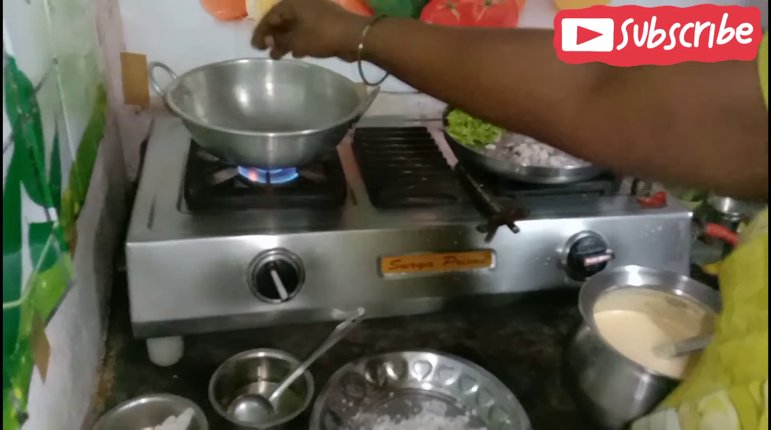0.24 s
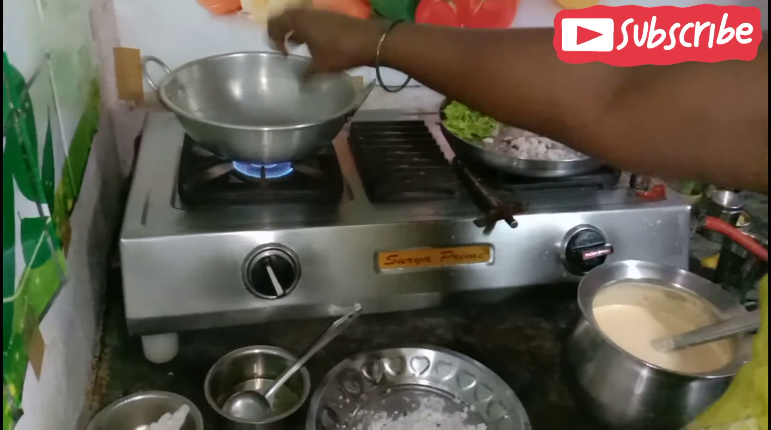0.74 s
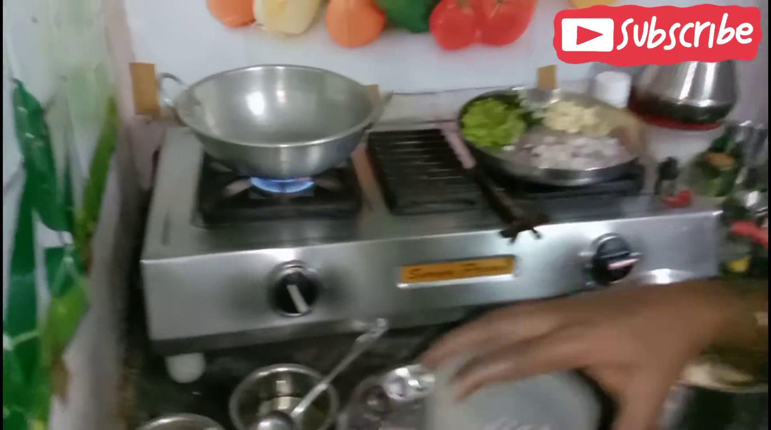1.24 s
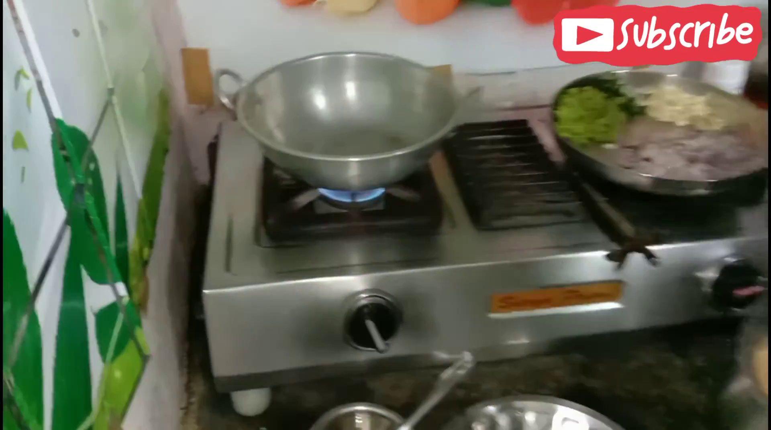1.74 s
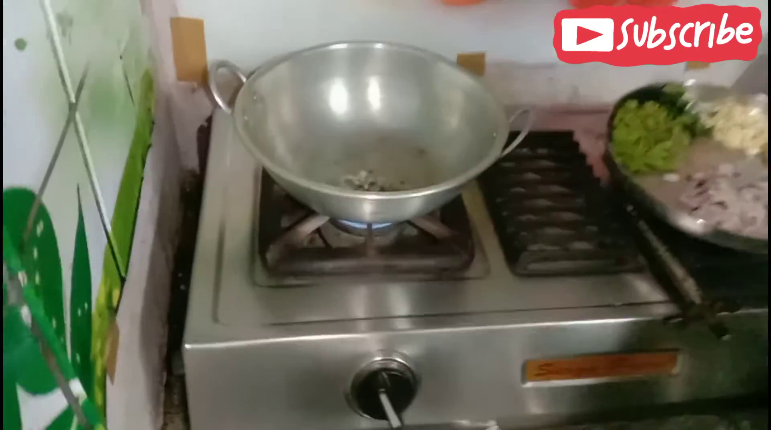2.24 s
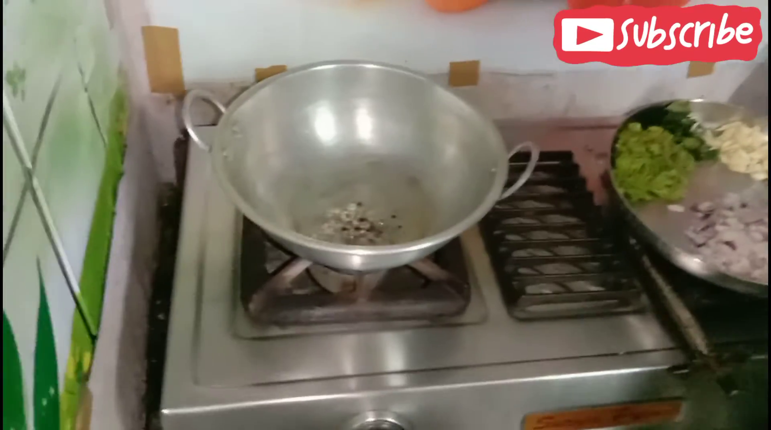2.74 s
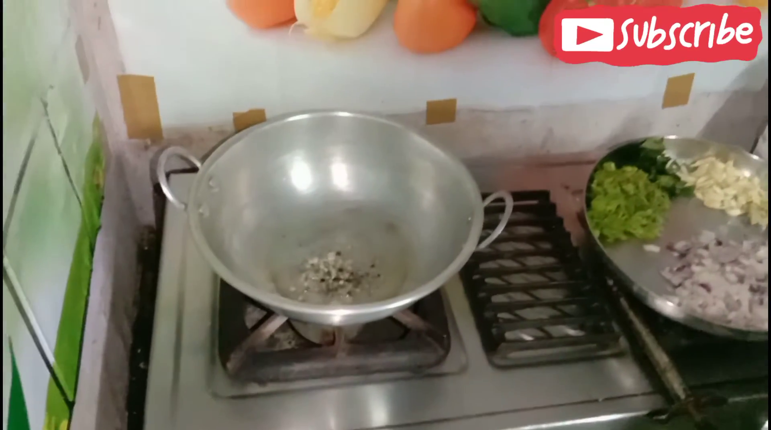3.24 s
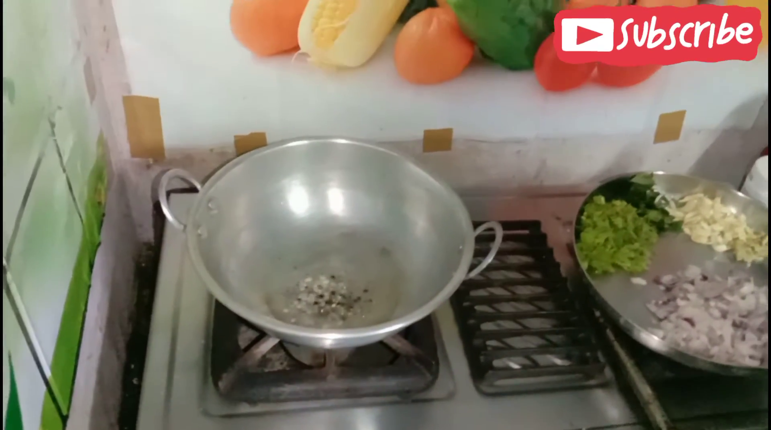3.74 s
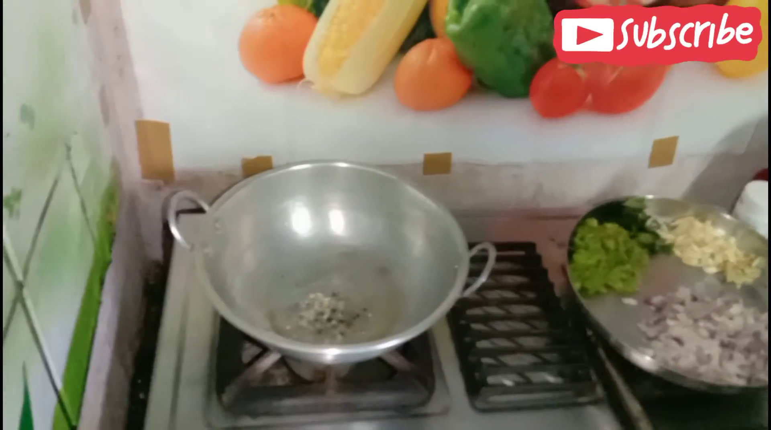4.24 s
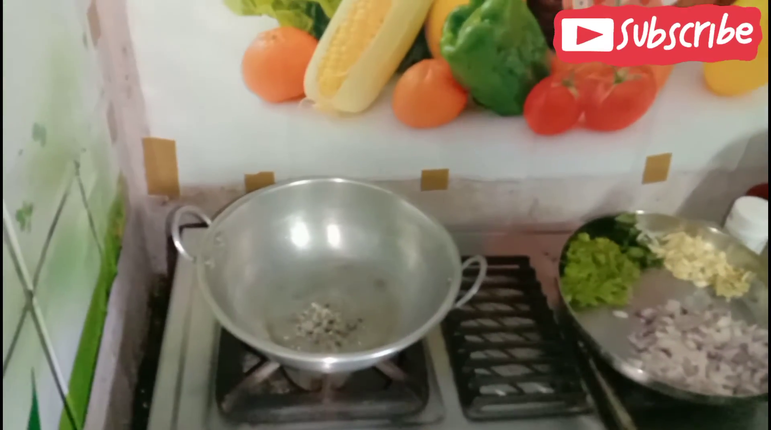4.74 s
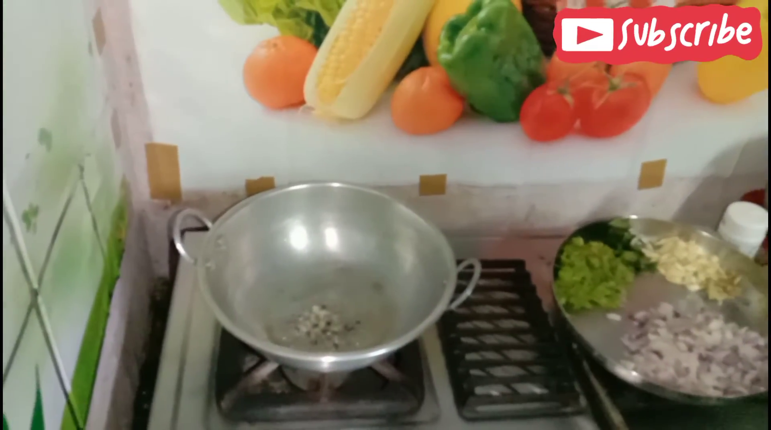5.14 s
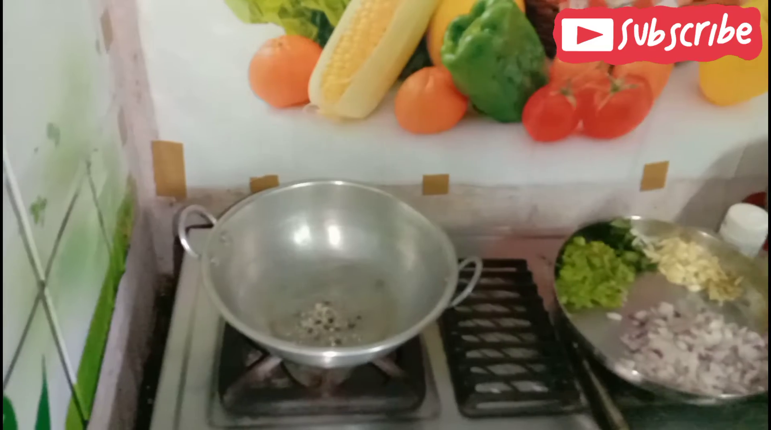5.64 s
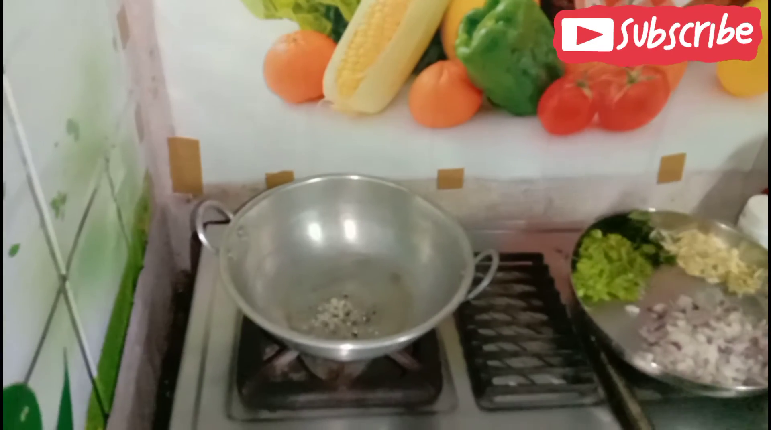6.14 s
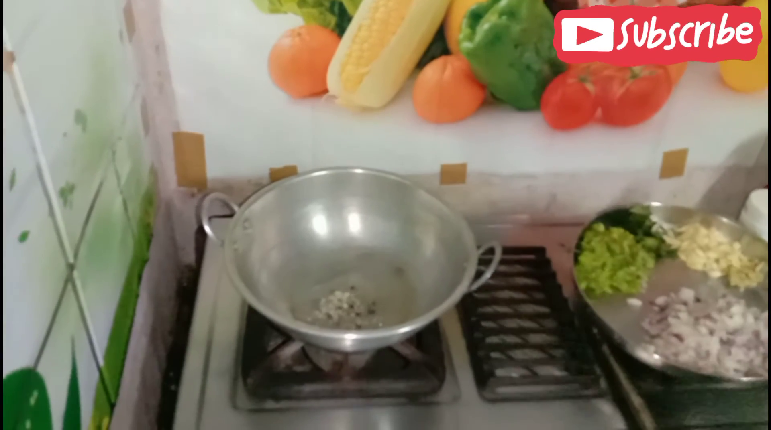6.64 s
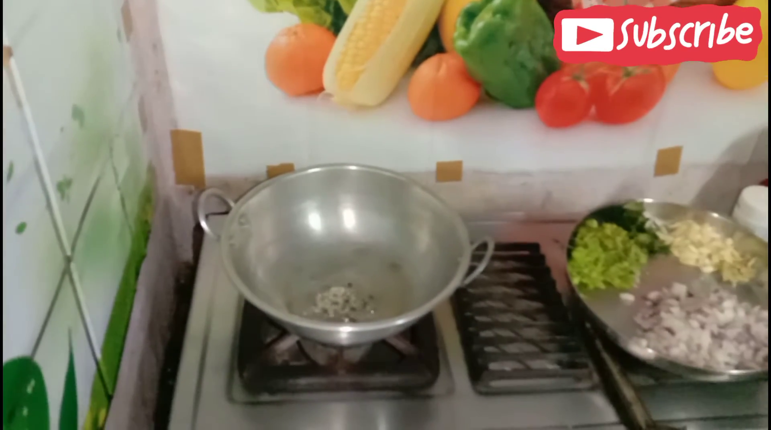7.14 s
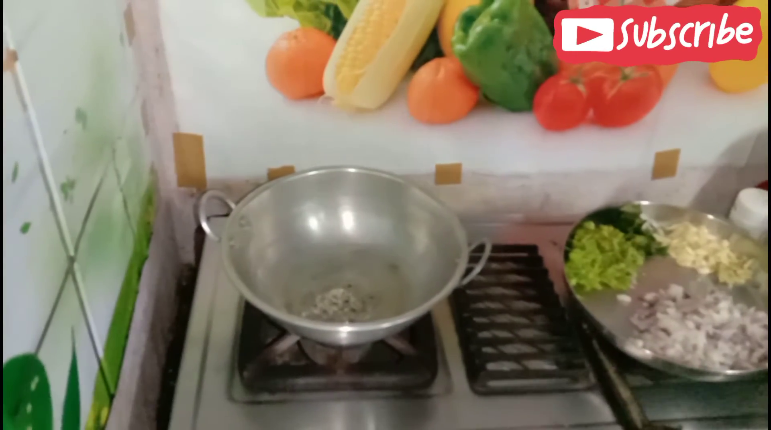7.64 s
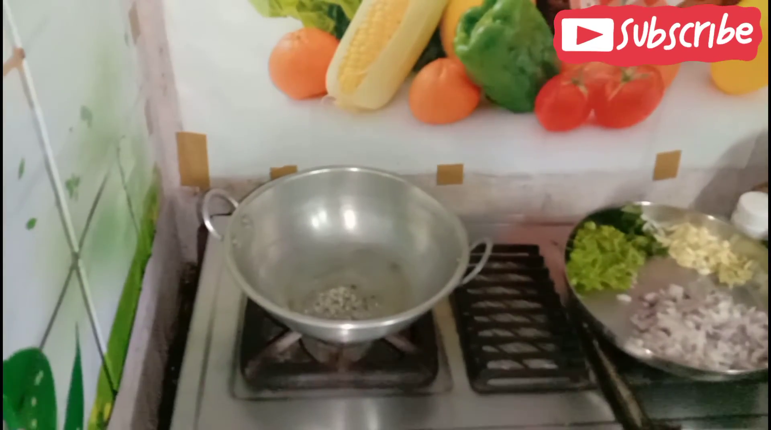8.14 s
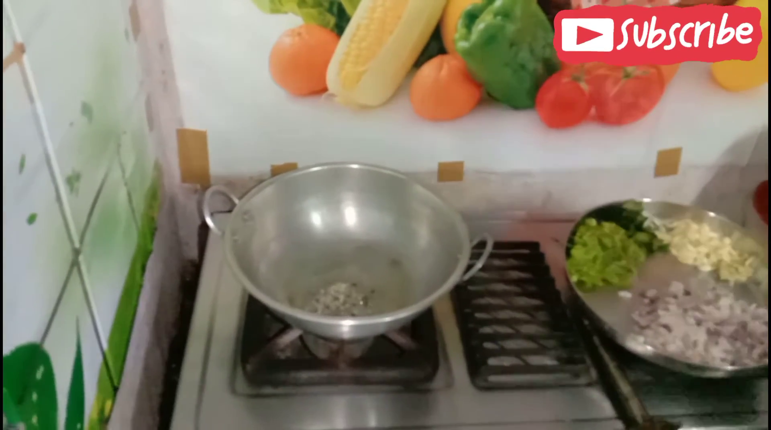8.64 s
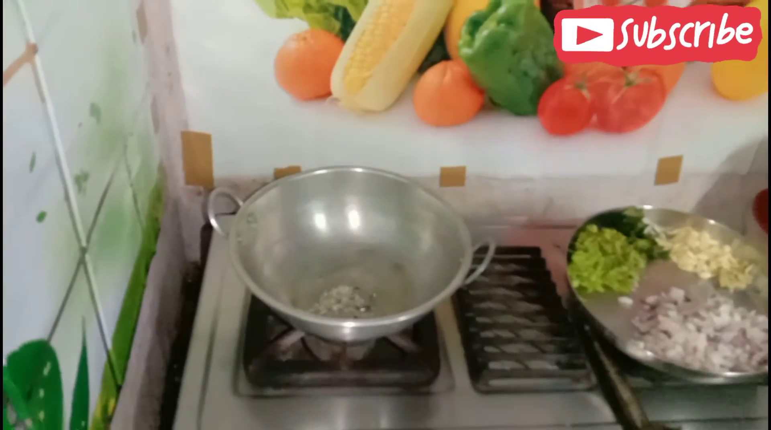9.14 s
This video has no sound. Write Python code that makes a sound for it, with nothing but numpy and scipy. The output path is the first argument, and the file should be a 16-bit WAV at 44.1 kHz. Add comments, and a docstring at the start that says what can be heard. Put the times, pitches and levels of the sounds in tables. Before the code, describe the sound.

Dry seeds patter into a ringing steel pan and splutter in oil; knocks and scrapes intrude midway, then the popping thins out.

```python
"""Seeds pop and fizz in hot oil in a steel pan over a gas flame, in a small tiled kitchen.
Pops and fizz are noise bursts and grains shaped by the seeds, the pan's modes and the oil spray.
Stray seeds tick and rain on the pan; dishes knock and drag on the counter, and a sliding jar groans.
Fingers tap the listening phone as one-cycle pushes; the flame's hiss and the house's rumble are
shaped noise. The phone's case and microphone port colour it all, with a rise in the lower treble."""
import sys
import numpy as np
from scipy import signal
from scipy.fft import rfft, irfft, next_fast_len
from scipy.io import wavfile
from scipy.ndimage import uniform_filter1d, map_coordinates

SR = 44100
rng = np.random.default_rng(int(sys.argv[2]) if len(sys.argv) > 2 else 0)


def transcribe(u):
    """Save the signal u as a 16-bit wav file named by the first command-line argument.

    u: samples, shape (n,) or (channels, n), limited to [-1, 1]; the rate is SR.
    q: integer samples, one column per channel.
    """
    v = np.clip(np.atleast_2d(u).T, -1, 1)
    q = np.round(v * 32767).astype(np.int16)
    wavfile.write(sys.argv[1], SR, q)


N = 414540
T = np.arange(SR // 3) / SR  # time within one short sound [s]

# the pan wall's broad clack: f/Hz, level/dB
PAN_WALL = [(400, -14), (800, -0.5), (1400, 0), (2500, 6), (3600, 3.5), (4500, -6)]
# spectrum of the oil spray: f/Hz, level/dB
OIL_SPRAY = [(6500, -13), (8200, 9), (11000, 8.5), (13000, -11.5)]
# spectrum of the spray's finest droplets: f/Hz, level/dB
FINE_MIST = [(9500, -39.5), (12000, 13), (16000, 6)]


def pops():
    """Each bursting seed snaps at its own pitch, knocks the pan and throws a fine spray."""
    # seed pops: t/s, peak level/dB, pitch f/Hz, pan share level/dB, pan pitch f/Hz, spray share level/dB
    seed_pops = [(0.0747, -44, 5170, -11, 1420, -39), (0.1107, -26, 6700, -18, 1430, -17.5),
                 (0.1521, -42, 5730, -35, 1430, -29), (0.2093, -18.5, 5740, -9.5, 1190, -11.5),
                 (0.2304, -38.5, 6500, -12, 1380, -19), (0.2673, -23.5, 5960, -23, 2250, -11.5),
                 (0.3065, -32, 5400, -10, 1410, -14), (0.3214, -24, 5630, -9, 1390, -19),
                 (0.3502, -26.5, 5600, -14, 1420, -14), (0.392, -25.5, 5900, -14, 1420, -10),
                 (0.4181, -27.5, 5400, -7.5, 1410, -13), (0.4612, -20.5, 5260, -14, 1250, -13),
                 (0.4941, -24.5, 5180, -38, 1450, -28), (0.63, -25, 5460, -19, 1420, -25),
                 (0.6994, -24.5, 5730, -2, 1200, -9.5), (0.7405, -23.5, 5700, -13, 1370, -21),
                 (0.7945, -27.5, 5100, -4.5, 1310, -18), (1.0978, -32, 5700, -10, 1260, -11),
                 (1.1169, -24, 5170, -13, 1410, -22), (1.1683, -30, 5640, -26, 2360, -38),
                 (1.2127, -38, 5300, -0.5, 2900, -25), (1.2441, -30.5, 5500, -22, 1420, -29),
                 (1.2938, -29.5, 5500, -11, 1420, -26), (1.374, -30.5, 5400, -4, 1340, -15),
                 (1.4219, -19, 5130, -14, 1330, -16), (1.5314, -31, 5620, -22, 1420, -19),
                 (1.6133, -31, 5600, -20.5, 1400, -25), (1.7874, -34.5, 5630, -9.5, 1510, -18),
                 (1.8437, -31, 5650, -18.5, 1500, -21), (1.9515, -31, 5180, -4.5, 2530, -35),
                 (2.0196, -27, 5380, -15, 2520, -31), (2.083, -27, 5580, -10.5, 1470, -23),
                 (2.2964, -24, 5810, -10.5, 1180, -29), (2.3879, -24, 5530, -15.5, 1300, -16),
                 (2.4476, -35, 5350, -20, 1890, -33), (2.5288, -26.5, 5450, -6, 915, -27),
                 (2.5643, -21.5, 5330, -13, 851, -22), (2.602, -20, 5470, -14, 1260, -39),
                 (2.6284, -23, 6050, -20, 1190, -33), (2.6691, -31.5, 5500, -5, 2050, -20),
                 (2.7114, -16, 5730, -11, 1910, -16.5), (2.8978, -30, 5540, -16, 1290, -30),
                 (2.9855, -20.5, 7050, -19, 1450, -28), (3.087, -43.5, 5750, 3.5, 1470, -26),
                 (3.1305, -29, 5660, -6, 964, -26), (3.1615, -25.5, 5740, -11, 1210, -24),
                 (3.2159, -24.5, 5750, -10, 851, -37), (3.2448, -26, 5440, -8.5, 1310, -19),
                 (3.2805, -16.5, 5770, -15.5, 1310, -34), (3.3198, -22, 5200, -13.5, 1490, -38),
                 (3.4937, -25, 5700, -39, 1230, -18), (3.5247, -22.5, 5030, -19, 940, -18),
                 (3.5603, -32, 5620, -15, 1980, -33), (3.5787, -15, 5740, -21.5, 990, -28),
                 (3.6617, -19.5, 6250, -28, 1590, -41), (3.728, -38.5, 5010, -15, 2840, -17.5),
                 (3.7464, -24, 5660, 0.5, 930, -26), (3.786, -22.5, 5330, -21, 2340, -34),
                 (3.8033, -22, 5580, -12.5, 1200, -12.5), (3.8796, -21, 5700, -4.5, 1250, -30),
                 (3.9112, -23.5, 5940, -17, 1260, -29), (4.004, -20, 5840, -20, 880, -43),
                 (4.0265, -19.5, 5660, -18, 851, -44), (4.0494, -22.5, 5760, -11.5, 1270, -35),
                 (4.0946, -30, 5950, -12, 867, -35), (4.1326, -22.5, 5600, -23, 1440, -41),
                 (4.1862, -30, 5140, -7.5, 1640, -10), (4.2155, -23, 5540, -32, 1640, -50),
                 (4.2362, -24.5, 5500, -12, 1470, -34), (4.2618, -17.5, 4900, -17, 1490, -27),
                 (4.3105, -21.5, 5170, -16.5, 1970, -22), (4.351, -31, 5700, 4, 1300, -22),
                 (4.3794, -12, 5700, -13, 1210, -18), (4.4344, -16, 5730, -22, 1170, -49),
                 (4.5433, -16.5, 5710, -24, 1420, -48), (4.5747, -23, 5340, -27, 1250, -26),
                 (4.6955, -23, 5320, -24, 1260, -37), (4.7337, -31, 5630, -29, 1460, -38),
                 (4.779, -23.5, 5670, -25.5, 1420, -49), (4.8288, -31, 5470, -29, 1280, -38),
                 (4.8703, -18.5, 6020, -41, 969, -38), (5.004, -34, 5800, -25, 1000, -35),
                 (5.021, -28, 5960, -32, 1270, -24), (5.0922, -34, 5660, -13, 1430, -33),
                 (5.1354, -22.5, 5350, -32, 1450, -47), (5.2053, -25, 5500, -10.5, 1450, -22),
                 (5.2382, -23, 5390, -24, 2470, -28), (5.3, -22, 5180, -26, 1480, -30),
                 (5.3379, -28, 5050, -17.5, 1150, -26), (5.5031, -26.5, 5250, -6.5, 1030, -25),
                 (5.5745, -34, 5310, -24, 1480, -24), (5.6253, -29.5, 5640, -34, 1440, -37),
                 (5.6438, -28, 5630, -27, 1440, -40), (5.7038, -27.5, 5620, -24.5, 2700, -25),
                 (5.7462, -16.5, 5230, -20, 1030, -34), (5.7973, -24, 5800, -19, 3370, -26),
                 (5.9648, -35.5, 5600, -37, 1490, -13), (6.0084, -28.5, 5000, -17.5, 1500, -35),
                 (6.0324, -27.5, 5800, -26, 1460, -31), (6.0737, -16.5, 4820, -15.5, 1060, -34),
                 (6.2088, -41, 5340, -15, 991, -8), (6.228, -26.5, 5420, -24.5, 1270, -42),
                 (6.3003, -32.5, 5800, -42, 1280, -17.5), (6.333, -25.5, 5000, -37, 1290, -44),
                 (6.3751, -34.5, 5630, -41, 1450, -40), (6.4836, -31.5, 6640, -35, 1470, -29),
                 (6.5686, -14, 6150, -18.5, 3270, -35), (6.6073, -19.5, 5380, -11, 1340, -21.5),
                 (6.7833, -38, 5750, -26, 1240, -26), (6.8453, -37, 5640, -10.5, 1480, -18),
                 (6.9758, -34.5, 5350, -24, 2000, -21), (7.43, -33.5, 5630, -14, 1810, -6),
                 (7.56, -38, 5300, -13, 1480, -22), (7.688, -28, 5340, -34, 2300, -51),
                 (7.8657, -30, 5460, -19, 1250, -45), (7.9151, -18.5, 5340, -21, 1510, -24.5),
                 (7.9523, -27.5, 5430, -16, 970, -12.5), (7.9865, -19, 5720, -21.5, 966, -20),
                 (8.0196, -20.5, 5360, -23.5, 960, -23), (8.1883, -35, 4770, -21, 1080, -24),
                 (8.323, -36, 5700, -25, 1280, -37), (8.6735, -20, 5970, -18.5, 950, -15),
                 (8.7804, -30, 5160, -6, 1330, -42), (8.8276, -18.5, 6000, -14, 1200, -12.5),
                 (8.9, -24.5, 5700, -42, 1430, -37), (9.0284, -36.5, 5170, -17.5, 2520, -31),
                 (9.2482, -25.5, 5730, -14, 1270, -8.5), (9.2935, -29.5, 5620, -18, 1540, -19)]
    # the wetter a pop, the more of its spray is fine mist
    mist_db, mist_db_per_spray_db = 19, 2.02
    s, db, hz, pan_db, pan_hz, spray_db = np.transpose(seed_pops)[..., None]
    s = s[:, 0]
    spread = rng.standard_normal((len(s), 3)).T[..., None]
    snaps = burst(len(s), click_db=18, snap=0.0098, wet_db=-8.5, t60=0.15)
    core = filtered(snaps, husk(hz, spread))
    core = amp(db) * core / np.abs(core).max(axis=1, keepdims=True)
    knocks = struck(db + pan_db, pan_hz)
    drops = burst(len(s), click_db=17.5, snap=0.022, wet_db=-5, t60=0.16)
    spray = filtered(place(s, amp(db + spray_db) * drops), colour(OIL_SPRAY))
    mist_gain = amp(db + mist_db_per_spray_db * spray_db + mist_db)
    mist = filtered(place(s, mist_gain * drops), colour(FINE_MIST))
    return place(s, core + knocks) + spray + mist


def husk(hz, spread):
    """A damped cavity, steep on both flanks, with sharper random tones scattered around its pitch."""
    tones = [(hz * (1 + 0.098 * u), 150, 2) for u in spread]
    return lambda f: modes([(hz, 1900, 0)])(f) ** 2 * (1 + modes(tones)(f))


def burst(count, click_db, snap, wet_db, t60):
    """A short hiss leads into a click; both echo off the tiles, then comes the room's tail."""
    lead_s, echo_s, tail_s, size = .0006, .0032, .0056, SR // 6
    echo = amp(rng.normal(-3, 2.5, (count, 1)))
    level = dying(snap) + echo * dying(snap, delay=echo_s) + amp(wet_db) * dying(t60, delay=tail_s)
    fade = np.minimum(1, 5 - 5 * np.arange(size) / size)  # over the last fifth
    noise = level[:, :size] * rng.standard_normal((count, size)) * fade
    noise[:, round(lead_s * SR)] += amp(click_db)
    noise[:, round((lead_s + echo_s) * SR)] += amp(click_db) * echo[:, 0]
    return noise


def struck(db, pan_hz):
    """Blows on the pan: a clack centred on the pitch of the spot, and the modes near it."""
    def spot(f):
        clack = colour(PAN_WALL)(f) * (0.8 + modes([(pan_hz, .3 * pan_hz, 6)])(f))
        return clack + amp(4.5) * near(pan_hz, slope_db=12)(f)
    blows = burst(len(db), click_db=12.0, snap=0.01, wet_db=-4.5, t60=0.21)
    return amp(db) * filtered(blows, spot)


def near(pan_hz, slope_db):
    """The pan's modes as one spot excites them: weaker by a slope per octave away from its pitch."""
    # modes of the steel pan: f/Hz, width f/Hz, level at the mode's own spot/dB
    steel_pan = [(975.4, 17, 8), (1424, 27.2, 18), (2024, 6.1, 13), (2380, 29, 21), (2850, 45, -3),
                 (3320, 45, 15.5)]
    return modes([(c, w, level - slope_db * np.abs(np.log2(c / pan_hz))) for c, w, level in steel_pan])


def fizz():
    """Countless tiny pops of three pitches merge into a grainy sizzle."""
    # small seeds fizzing: t/s, level/dB
    fizz_level = [(0.0, -43), (0.23, -46.5), (1.41, -46.5), (1.62, -53.5), (1.86, -55.5), (2.15, -49.5),
                  (2.64, -45), (3.03, -50.5), (3.4, -46), (3.87, -50), (4.29, -50.5), (4.76, -56.5),
                  (5.97, -59), (6.47, -54.5), (7.07, -64), (7.75, -64.5), (8.06, -61.5), (8.56, -63),
                  (8.87, -54.5), (9.03, -59), (9.27, -64), (9.4, -53)]
    # shares of the fizz; the spray thins as the seeds dry
    pan_db, start_spray_db, drying_db_per_s = -9, 6, 1.9
    grains = [crackle(rate=45) * rng.standard_normal((3, N)) for _ in range(3)]
    core = np.zeros(N)
    for grain, hz in zip(grains, (5000, 5800, 6800)):
        core += filtered(grain[0], lambda f: modes([(hz, 1500, 0)])(f) ** 2)
    knocks = unit(pan_wall(grains[0][1], ring_db=11.0))
    # the spray's body joined to the treble of the mist
    spray = unit(filtered(grains[2][2], colour(OIL_SPRAY[:3] + FINE_MIST[1:])))
    spray_db = start_spray_db - drying_db_per_s * np.arange(N) / SR
    return amp(curves(fizz_level)[0]) * (unit(core) + amp(pan_db) * knocks + amp(spray_db) * spray)


def crackle(rate):
    """The level of many random ticks, rate a second, each smeared by the room."""
    ticks = (rng.random(N) < rate / SR) * amp(rng.uniform(-9, 9, N))
    room = dying(0.09) ** 2 + amp(-5.5) * dying(0.2) ** 2
    power = signal.fftconvolve(ticks ** 2, room)[:N]
    return np.sqrt(np.abs(power) / np.mean(power) + 0.033)  # a faint steady floor between ticks


def pan_wall(x, ring_db):
    """Under the oil the pan answers with a broad clack and mainly its two lowest modes."""
    return filtered(x, lambda f: colour(PAN_WALL)(f) + amp(ring_db) * near(965, slope_db=16)(f))


def strikes():
    """Blows on the pan: thrown seeds tick on its dry wall, and a few further pops strike it."""
    # thrown seeds and a few further pops: t/s, level/dB, pan pitch f/Hz
    pan_ticks = [(0.2488, -27, 1370), (0.3306, -54, 1430), (0.815, -32.5, 1360), (0.932, -38.5, 1430),
                 (0.991, -42, 2400), (1.2543, -33.5, 1350), (1.34, -48, 1430), (2.6879, -30.5, 2340),
                 (2.9824, -38, 1390), (5.0582, -43, 3640), (5.2019, -35, 3500), (6.8964, -50, 2400),
                 (7.431, -49, 1800), (8.5342, -57, 3240), (9.363, -48, 2400)]
    s, db, pan_hz = np.transpose(pan_ticks)[..., None]
    return place(s[:, 0], struck(db, pan_hz))


def pelting():
    """A rain of dry seeds keeps the bare pan's modes ringing."""
    # pinches of seeds landing: t/s, level/dB, t60/s
    pinches = [(.252, -25.5, 0.18), (.333, -31.5, 0.17), (.385, -36.5, 0.16), (.47, -49, 0.12),
               (.82, -45, 0.13), (.94, -43.5, 0.54), (1.45, -50, 0.68)]
    ticks = (rng.random(N) < 300 / SR) * rng.standard_normal(N)  # about 300 a second
    trickle = amp(-55) * (np.arange(N) < pinches[-1][0] * SR)  # runs until the last pinch
    level = swells(pinches, rise=0.027) + trickle
    return level * unit(filtered(ticks, near(1600, slope_db=24)))


def counter():
    """Dull thuds at their own pitch, mostly things set down, shake the counter; dishes clatter and drag over
    it."""
    # knocks, most of them things set down: t/s, level/dB, pitch f/Hz, clatter share level/dB, t60/s
    hits = [(1.046, -36.5, 650, -23, 0.37), (1.166, -32.5, 443, -35, 0.19),
            (1.954, -36.5, 940, -29, 0.89), (2.502, -4.5, 680, -21.5, 0.25),
            (2.549, -12.5, 827, -24, 0.33), (2.689, -18.5, 725, -13, 0.78),
            (2.739, -15, 710, -20, 0.55), (2.771, -16.5, 755, -24, 0.18), (2.845, -13, 766, -22, 0.09),
            (3.133, -25, 950, -10, 0.44), (3.157, -18.5, 610, -17, 0.33),
            (3.199, -23.5, 410, -7.5, 0.44), (3.522, -21, 450, -19, 0.2),
            (3.748, -17.5, 438, -43, 0.37), (3.882, -19, 575, -8, 0.42), (3.994, -9.5, 466, -42, 0.38),
            (4.17, -33, 393, -2, 0.11), (4.31, -24.5, 500, -54, 0.66), (4.342, -12.5, 490, -13, 0.34),
            (4.35, -22, 227, -40, 0.58), (4.397, -14.5, 1190, -17, 0.41),
            (4.419, -14, 523, -10.5, 0.16), (4.692, -27.5, 500, -19.5, 0.32),
            (7.832, -35.5, 125, -21, 0.91), (7.861, -39.5, 450, -18, .63), (8.1, -36.5, 176, -20, 0.69),
            (8.159, -33.5, 342, -32, .48)]
    # modes of the counter: f/Hz, width f/Hz, level/dB
    counter_modes = [(148.5, 4.5, -0.5), (288.5, 11, -1.5), (403.5, 11, 0), (514, 12, -7.5), (647, 39, -8),
                     (803, 31, -1.5), (909, 30, -0.5)]
    # spectrum of the clatter: f/Hz, level/dB
    clatter_tone = [(700, -37), (1200, 4), (2000, 7.5), (3200, -30), (4200, -38.5)]
    # dishes pushed over the counter: t/s, level/dB, t60/s
    pushes = [(2.7, -45, 0.23), (3.44, -57, 1.9), (3.92, -66, 3)]
    thud_width, shake_db = 0.18, -2.5  # width as a share of the pitch; the counter's answer
    attack_s, softens = .0003, 0.72  # rise of a 0 dB knock; dB slower for each dB gentler
    s, db, hz, clatter_db, t60 = np.transpose(hits)
    rise = 1 - np.exp(-T / (attack_s * amp(-softens * db)[:, None]))
    rise = rise * (1 + 0.92 * dying(0.055))  # the blow itself stands out over the rattle
    blows = [r * dying(np.clip(d, .03, 1)) * rng.standard_normal((2, len(T))) for r, d in zip(rise, t60)]
    thuds = []
    for level, pitch, blow in zip(db, hz, blows):
        thud = filtered(blow[0], modes([(pitch, thud_width * pitch, 0)]))
        # a narrow band passes less noise: even that out
        thuds.append(amp(level) * thud * np.sqrt(150 / pitch / thud_width))
    shakes = place(s, [amp(level + shake_db) * blow[0] for level, blow in zip(db, blows)])
    clatter = place(s, [amp(level) * blow[1] for level, blow in zip(db + clatter_db, blows)])
    scrape = rng.standard_normal(N) * amp(1.33 * wobble(40))
    drag = swells(pushes, rise=0.28) * unit(filtered(scrape, modes(counter_modes)))
    knocks = place(s, thuds) + filtered(shakes, modes(counter_modes))
    return knocks + filtered(clatter, colour(clatter_tone)) + drag


def groan():
    """A hollow jar groans as it slides: an unsteady tone whose pitch slides."""
    # the groan: t/s, level/dB, f/Hz
    jar = [(3.85, -48, 541), (3.89, -38.5, 640), (3.94, -44, 625), (3.99, -40, 550), (4.02, -46, 520)]
    db, hz = curves(jar)
    inside = (np.arange(N) > jar[0][0] * SR) & (np.arange(N) < jar[-1][0] * SR)
    phase = 2 * np.pi * np.cumsum(hz * (1 + .02 * wobble(88))) / SR
    return inside * amp(db + 7.2 * wobble(70)) * np.sin(phase)


def taps():
    """Fingers on the phone: dry, soft one-cycle pushes through the case, which rings briefly; no room."""
    # finger taps: t/s, push level/dB, pitch f/Hz, case ring share level/dB
    finger_taps = [(2.165, -32, 855, 4), (2.173, -20.5, 720, 0.5), (2.25, -23, 1050, -16.5),
                   (2.255, -35, 307, 18), (2.29, -30, 634, -10), (2.294, -29.5, 500, -18),
                   (2.312, -10, 840, -15.5), (2.319, -13, 1090, -8), (2.358, -25.5, 443, -11),
                   (2.382, -16.5, 1030, -10), (2.891, -21.5, 810, -4), (3.448, -33, 292, -19),
                   (3.459, -28, 563, -13), (3.484, -22, 394, 9.5)]
    case_hz, case_t60_s = 1150, 0.0083
    s, db, hz, ring_db = np.transpose(finger_taps)[..., None]
    push = np.sin(2 * np.pi * hz * T) * np.exp(-(2.1 * (hz * T - .75)) ** 2)
    push = push * (1 - np.exp(-(T / 0.00008) ** 2))  # soft onset
    ring = np.sin(2 * np.pi * case_hz * T) * dying(case_t60_s) * (1 - np.exp(-T / .0005))
    return place(s[:, 0], amp(db) * (push + amp(ring_db) * ring))


def background():
    """Shaped noise: the gas flame hisses almost evenly; the rumble of the house swells and fades."""
    # low rumble of the house: t/s, level/dB
    rumble_level = [(0, -72.5), (1.9, -69.5), (2.72, -55.5), (2.96, -68), (4.53, -58.5), (4.95, -69.5),
                    (7.85, -73.5), (8.04, -70), (9.4, -66.5)]
    # spectrum of the rumble: f/Hz, level per Hz/dB
    rumble_tone = [(15, -52), (25, -37.5), (48, 1.5), (86, -6.5), (162, -7), (237, -5), (316, -9.5),
                   (800, -22.5), (1040, -67), (1760, -120)]
    # spectrum of the gas hiss: f/Hz, level per Hz/dB
    flame_tone = [(300, -10.5), (700, -14.5), (1300, -4.5), (3000, -18.5), (6000, -9.5), (16000, -1.5)]
    rumble = unit(filtered(rng.standard_normal(N), colour(rumble_tone)))
    rumble = rumble * amp(curves(rumble_level)[0] + 0.78 * wobble(4) + 1.9 * wobble(20))
    flame = unit(filtered(rng.standard_normal(N), colour(flame_tone)))
    return rumble + amp(-61.5 + 0.42 * wobble(9.8)) * flame


def lulls():
    """A gain that dips briefly inside each lull, with soft edges."""
    # lulls of the sizzle and the background: from t/s, to t/s, level/dB
    dips = [(1.653, 1.793, -5), (1.866, 1.94, -7)]
    t = np.arange(N) / SR
    db = sum(level * ((t > a) & (t < b)) for a, b, level in dips)
    return amp(uniform_filter1d(db, size=SR // 100))


def amp(db):
    """Gain of a level in dB."""
    return 10 ** (np.asarray(db) / 20)


def unit(x):
    """x at rms 1."""
    return x / np.sqrt(np.mean(x ** 2) + 1e-20)


def curves(rows):
    """One value per sample for each column after the time."""
    s, *cols = np.transpose(rows)
    return [np.interp(np.arange(N) / SR, s, c) for c in cols]


def wobble(rate):
    """A smooth random curve, rate knots a second."""
    knots = rng.standard_normal(int(N * rate / SR) + 4)
    return map_coordinates(knots, [np.arange(N) * rate / SR])


def dying(t60, delay=0.):
    """A decay by 60 dB in t60 seconds that starts after a delay."""
    return amp(-60 * np.abs(T - delay) / t60) * (T >= delay)


def swells(rows, rise):
    """The level of (s, dB, t60) events that swell by 60 dB in rise seconds, then die away."""
    t = np.arange(N) / SR
    return sum(amp(db - 60 * np.where(t < s, (s - t) / rise, (t - s) / t60)) for s, db, t60 in rows)


def place(times, sounds):
    """Short sounds laid out at their times."""
    out = np.zeros(N + len(T))
    for s, sound in zip(times, sounds):
        out[round(s * SR):][:len(sound)] += sound
    return out[:N]


def filtered(x, response):
    """x times a complex response of frequency."""
    n = x.shape[-1]
    m = next_fast_len(n + 2048)  # room for the ringing
    return irfft(rfft(x, m) * response(np.fft.rfftfreq(m, 1 / SR)), m)[..., :n]


def colour(points):
    """The causal response whose gain follows (Hz, dB) points on a log axis."""
    def response(hz):
        f, db = np.transpose(points)
        # folding the cepstrum forward gives minimum phase
        cep = irfft(np.log(amp(np.interp(np.log(hz + 1), np.log(f), db))))
        cep[1:len(cep) // 2] *= 2
        cep[len(cep) // 2 + 1:] = 0
        return np.exp(rfft(cep))[:len(hz)]
    return response


def modes(rows):
    """The response of (Hz, width Hz, dB) resonances, with alternating signs."""
    def response(f):
        total = 0
        for k, (c, w, db) in enumerate(rows):
            total = total + (-1) ** k * amp(db) * 1j * f * w / (c * c - f * f + 1j * f * w)
        return total
    return response


def scene():
    """Everything heard at the phone."""
    pan = pops() + strikes() + pelting()
    handling = counter() + groan() + taps()
    return (pan + handling + lulls() * (fizz() + background()))[None]


def record(dry):
    """The case's resonance and the port colour the sound; nothing is kept above the band limit."""
    # the microphone behind its port: f/Hz, level/dB
    port = [(30, -22), (70, 2), (3000, -2), (4000, -4.5), (4800, -1), (5600, 3.5), (6500, -3), (7300, -2.5),
            (8050, -17.5), (8800, -7.5), (10500, -12.5), (13800, -27.5), (15000, -13.5), (15500, -20.5),
            (16400, -39.5)]
    top_hz = 16600
    case = modes([(1267, 43.0, 6.3)])
    return filtered(dry, lambda hz: (1 + case(hz)) * colour(port)(hz) * (hz < top_hz))


dry = scene()
out = record(dry)
transcribe(out)
```